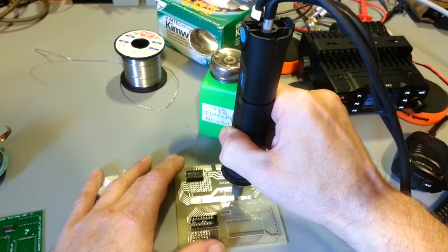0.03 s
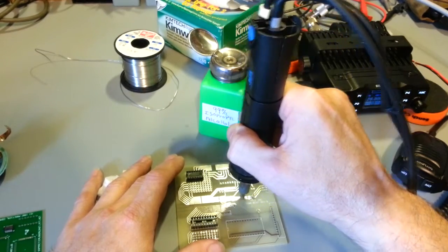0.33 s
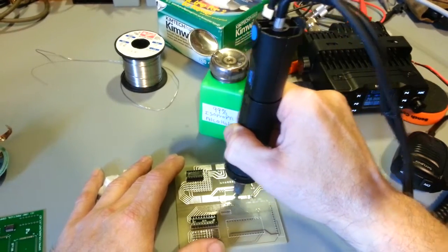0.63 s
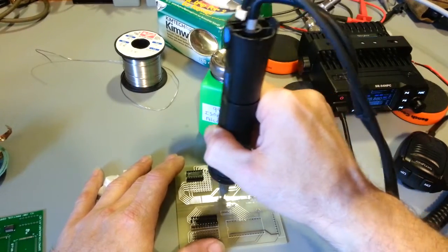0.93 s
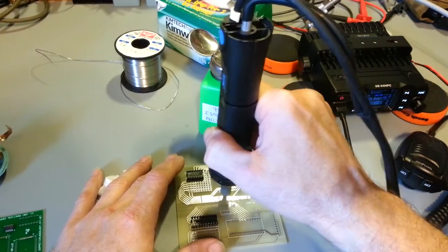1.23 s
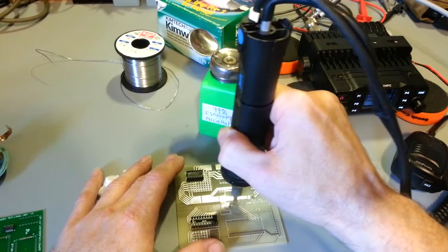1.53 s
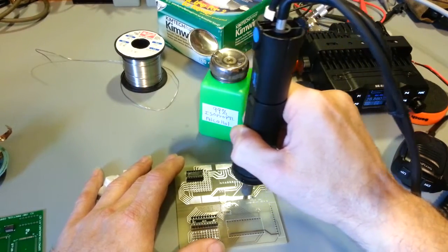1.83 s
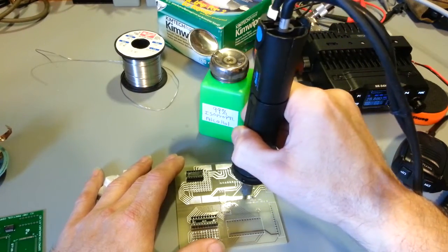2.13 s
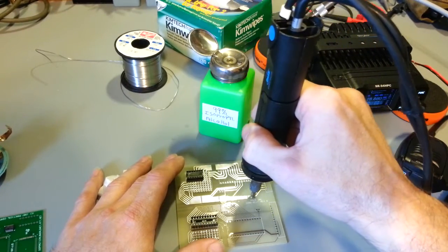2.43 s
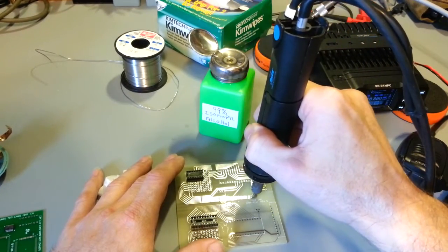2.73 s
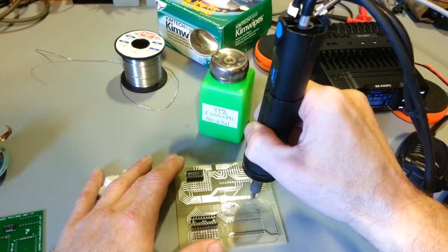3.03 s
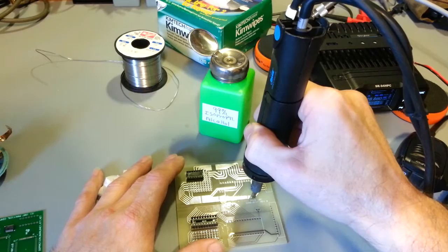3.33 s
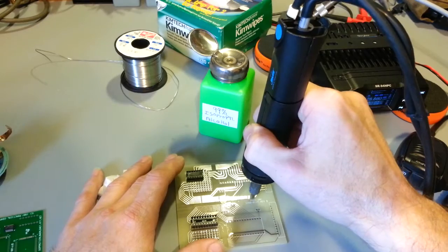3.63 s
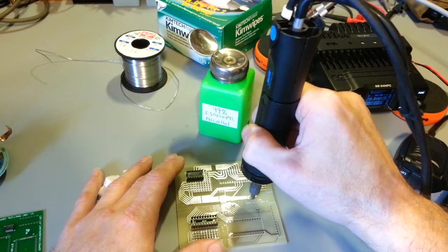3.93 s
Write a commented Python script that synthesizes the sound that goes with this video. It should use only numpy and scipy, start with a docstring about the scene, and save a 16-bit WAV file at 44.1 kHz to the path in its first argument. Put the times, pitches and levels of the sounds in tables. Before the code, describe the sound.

A desoldering gun's vacuum pump buzzes and hisses, then stops, leaving light metallic ticks.

```python
"""The buzzing drone of a desoldering gun's vacuum pump on a workbench, at 53 turns a second,
sagging a little while the nozzle is blocked. Air hisses and solder spits through the nozzle.
Near two seconds the trigger is let go and the pump stalls with a few knocks of its casing.
In the quiet room a fan hums, hand and hose rustle, and the metal nozzle ticks on the circuit board."""
import sys
import numpy as np
from scipy import signal
from scipy.fft import rfft, irfft
from scipy.io import wavfile

SR = 44100
rng = np.random.default_rng(int(sys.argv[2]) if len(sys.argv) > 2 else 0)


def persist_wave(psi):
    """Save psi, clipped to +-1, as 16-bit WAV."""
    counts = np.round(np.clip(psi, -1, 1) * 32767).astype(np.int16)
    wavfile.write(sys.argv[1], SR, np.atleast_2d(counts).T)


N = 176400
TIME = np.arange(N) / SR

# Ticks of trigger and nozzle: start_s, strength_db, then trims body_db, metal_db, treble_db, board_db
TICK_HITS = [(1.9593,-6,5.5,-3.5,-15,-18),(2.643,-25.5,5.5,-6,-2.5,-3),(3.0278,-11,-6,0.5,0,-6),(3.148,-12,1,3,6,3),(3.237,-35.5,-3,-3,0,-12),(3.31,-29,-12,-23,6,-13),(3.3664,-25,2.5,-2.5,-6,4),(3.6457,-14.5,-3,0.5,-6.5,-5.5)]


def pump():
    """Two strokes a turn make a drone with pulsing air and valve clatter; it dives away on stalling."""
    # Shaft harmonics: order, free_db, loaded_db, left_minus_right_db, left_lead_rad
    harmonics = [(1, -59, -59, 0, -0.1), (2, -57, -55, 1, 0.0), (3, -56, -55, 0, 0.5),
                 (4, -53, -51, 4, 0.0), (5, -49, -47, 0, 0.1), (6, -46, -42, 0, 0.1),
                 (7, -31, -33, -1, 0.0), (8, -56, -61, -4, 0.1), (9, -34, -34, -4, 0.2),
                 (10, -47, -40, -8, 0.7), (11, -38, -39, 6, -2.9), (12, -52, -42, 1, 1.6),
                 (13, -50, -47, -3, -0.5), (14, -46, -46, -4, 1.6), (15, -39, -33, 6, 0.5),
                 (16, -33, -47, 2, 0.1), (17, -36, -41, 9, -0.0), (18, -42, -40, -1, 0.5),
                 (19, -46, -45, 5, 1.8), (20, -42, -45, 6, 0.4), (21, -48, -44, 5, 1.2),
                 (22, -53, -49, 10, 0.6), (23, -54, -44, -2, 1.8), (24, -46, -49, 5, 1.5),
                 (25, -61, -57, -3, 0.0), (26, -55, -48, -4, 1.7), (27, -42, -54, -19, -0.9),
                 (28, -46, -50, -4, 2.6), (29, -46, -45, -4, -2.5), (30, -46, -47, 9, -3.1),
                 (31, -46, -48, 0, 0.7), (32, -48, -42, -4, 1.6), (33, -48, -54, -9, -1.3),
                 (34, -43, -44, -3, -0.4), (35, -48, -50, 5, -0.6), (36, -51, -54, 3, -2.2),
                 (37, -52, -44, 0, 2.8), (38, -51, -49, 4, -0.9), (39, -50, -46, 2, -1.0),
                 (40, -46, -48, 7, -1.7), (41, -47, -46, 2, 2.4), (42, -50, -55, -3, -2.0),
                 (43, -56, -57, -2, 0.7), (44, -60, -57, -1, -1.3)]
    # Shaft speed: time_s, turns_per_s
    speed = [(0,53.42),(.15,53.43),(.3,53.3),(.45,53.47),(.6,52.85),(.75,53.1),(1.08,53.1),(1.25,53.28),(1.36,53.5),(1.48,53.3),(1.72,53.31),(1.9,53.6)]
    # Suction load: time_s, share (0-1)
    suction_load = [(0,0.1),(.46,0.03),(.53,.85),(.72,1),(.93,1),(1.12,0.14),(1.4,0),(1.47,0.25),(1.66,0.13),(1.9,0.1)]
    # Faint buzz above the drone: pitch_hz, level_db
    buzz_levels = [(2400,-63),(2800,-62.5),(3200,-68),(3600,-67),(4000,-60),(4400,-69)]
    # Air rushing inside the pump: freq_hz, gain_db
    rush_eq = [(20,-18),(60,-24),(200,-27),(400,-8),(650,-7),(900,0),(1300,-1.5),(2100,-8),(2600,-11),(3400,-18),(4000,-11.5),(4500,-16),(5200,-16),(6000,-53),(15000,-45)]
    # Valve clatter: freq_hz, gain_db
    clatter_eq = [(500,-30),(1300,-10),(1800,15.5),(2250,-3),(2700,-7),(4000,9),(5500,-37),(14000,-35)]
    stop_s, stall_s, fade_db_per_s = 1.966, .1, 194
    smear_rad, chatter_order, clatter_decay_turns = .08, 24, 0.35
    coast_s = np.maximum(TIME - stop_s, 0)
    brake = np.maximum(1 - coast_s / stall_s, 0)
    turns = np.cumsum(curve(speed) * brake * (1 + 0.00099 * drift(hz=40))) / SR
    fade = amp(-fade_db_per_s * coast_s) * np.sqrt(brake)
    load = np.clip(curve(suction_load), 0, 1)
    orders, free_db, loaded_db = np.transpose(harmonics)[:3]
    drone, side = np.zeros((2, N)), np.array([[.5], [-.5]])
    for k, _, _, side_db, lead in harmonics:
        # The body's colour stays put while the harmonics slide down through it.
        free = np.interp(k * brake, orders, amp(free_db))
        loaded = np.interp(k * brake, orders, amp(loaded_db))
        gain = (1 - load) * free + load * loaded
        phase = np.pi / 2 * (k % 2) + .25 * rng.standard_normal()  # two strokes: odd orders in quadrature
        if k >= chatter_order:  # valve chatter loosens the phases
            phase = .8 * rng.standard_normal()
        phase -= smear_rad * k ** 2  # hose and casing delay the higher orders more
        flutter = 1 + .07 * drift(hz=25.6)
        pan = unit(amp(side * side_db))
        drone += np.sqrt(2) * gain * flutter * pan * np.cos(2 * np.pi * k * turns + phase + side * lead)
    for k in range(len(orders) + 1, 84):  # the buzz, leaning left
        gain = amp(read(buzz_levels, k * speed[0][1]) + 2.6 * rng.standard_normal((2, 1)) + side * 11.5)
        drone += gain * np.cos(2 * np.pi * (k * turns + rng.random((2, 1))))
    rush = amp(-39.5) * noise(rush_eq) * (1 + 0.39 * np.cos(2 * np.pi * 2 * turns))
    clatter = amp(-43) * noise(clatter_eq) * np.exp(-((turns + 0.23) % 1) / clatter_decay_turns)
    return room((drone + rush + clatter) * fade, wet_db=-20.5)


def stall_knocks():
    """The last slow strokes knock the pump casing."""
    # Last strokes: start_s, strength_db
    strokes = [(1.977,-30),(1.995,-27.5),(2.018,-41.5)]
    # Casing modes: pitch_hz, gain_db, t60_s
    casing = [(352,-21,0.13),(533,2,0.067),(662,-4.5,0.041),(835,-8,0.076),(1097,-7,0.08),(1620,-8,0.036),(1940,-8,0.051),(2230,-11,.04),(2800,-17,0.023)]
    knocks = np.zeros(N)
    for start_s, db in strokes:
        add(knocks, start_s, amp(db) * ring(casing))
    return room(knocks, wet_db=-7)


def nozzle_hiss():
    """Air sucked through the nozzle hisses in flickering surges."""
    # Surges: time_s, level_db
    surges = [(0,-41.5),(.2,-42.5),(.27,-37.5),(.34,-44.5),(.43,-42),(.46,-31.5),(.52,-31),(.57,-37.5),(.66,-43),(.86,-39.5),(1.05,-44),(1.35,-43),(1.42,-36.5),(1.48,-41.5),(1.57,-40),(1.68,-41.5),(1.9,-39.5),(1.96,-35),(2.02,-38.5),(2.085,-54.5),(2.16,-59),(2.21,-87)]
    # Bright hiss: freq_hz, gain_db
    hiss_eq = [(1500,-30),(3000,0),(4000,-6),(4500,1.5),(5200,-0.5),(6100,-5),(7300,3),(8600,4),(10200,3),(11400,-4.5),(12600,5),(13700,5),(14600,-2.5)]
    return unit(at_nozzle(noise(hiss_eq))) * amp(curve(surges) + 1.2 * drift(hz=85))


def solder_spits():
    """Solder spits in the nozzle in short, crackling bursts."""
    # Spits: start_s, strength_db, length_s
    spits = [(.007,-33,0.0039),(0.0089,-21.5,0.0028),(0.039,-21.5,0.0018),(.091,-31,.002),(0.1145,-19.5,0.0028),(.122,-34,0.0037),(.139,-25.5,0.0036),(.2105,-21,0.0017),(0.248,-18.5,0.024),(0.261,-21,0.035),(0.289,-23,0.0019),(0.305,-29,0.0035),(0.45,-28,.03),(0.492,-19,0.001),(.497,-25,0.044),(0.587,-23,0.052),(1.23,-31,0.0044),(1.395,-23.5,.02),(1.4267,-19.5,0.0019),(1.432,-21.5,0.0054)]
    # Sharp crackle: freq_hz, gain_db
    spit_eq = [(500,-18),(2000,4),(3200,-2),(4000,-1),(4700,6.5),(5400,-2),(6200,-4),(8000,2),(10500,-3),(12000,-10),(15000,-14)]
    crackle, t = np.zeros(N), TIME[:SR // 16]
    for start_s, db, length_s in spits:
        burst = rng.standard_normal(len(t)) * rng.exponential(1, len(t)) * np.exp(-2 * t / length_s)
        add(crackle, start_s, amp(db + 13.5) * burst / np.linalg.norm(burst))
    return at_nozzle(room(colour(crackle, spit_eq), wet_db=-4))


def ticks():
    """Each tick rings the gun's body, tube and tip over a dull board knock; the bench throws it back."""
    # Gun modes: pitch_hz, gain_db, t60_s
    gun = [(1074,-12.5,0.017),(1690,-5,0.0093),(2145,-3,0.0085),(3320,-5,0.0073),(3580,-1,0.0058),(4145,2.5,0.0088),(5050,-0.5,0.0043),(7400,-0.5,.004),(8300,-6,0.0048),(9570,-5,0.0049),(12700,-16,0.0012)]
    # Circuit board modes: pitch_hz, gain_db, t60_s
    board = [(332,-20.5,0.083),(485,-22.5,0.061),(650,-18.5,0.034),(980,-17,0.02)]
    # Early echoes off the bench and its gear: delay_s, left_gain, right_gain
    echoes = [(.0009,0.17,0.13),(.0022,0.49,.15),(.0062,0.45,0.075),(.009,.17,.08),(0.012,0.045,0.047)]
    body_top_hz, treble_from_hz = 2800, 6000
    hits = np.zeros(N)
    for start_s, db, body_db, metal_db, treble_db, board_db in TICK_HITS:
        modes = []
        for hz, gain_db, t60 in gun:
            trim_db = body_db if hz < body_top_hz else treble_db if hz > treble_from_hz else metal_db
            modes.append((hz, gain_db + trim_db, t60))
        add(hits, start_s, amp(db - 13) * (ring(modes) + amp(board_db) * ring(board)))
    ears = np.array([amp(-6) * np.roll(hits, 4), hits])  # softer and later on the left
    for delay_s, left, right in echoes:
        add(ears[0], delay_s, left * hits)
        add(ears[1], delay_s, right * hits)
    return room(ears, wet_db=-7.5)


def contact_snaps():
    """The first contact of metal puts a dry, bright snap on each tick."""
    # Snap: freq_hz, gain_db
    snap_eq = [(500,-28),(3000,-12),(6000,-3),(8500,7.5),(11000,-5),(14500,-7)]
    decay_s = .0006
    snaps, t = np.zeros(N), TIME[:SR // 100]
    for start_s, db, _, _, treble_db, _ in TICK_HITS:
        burst = rng.standard_normal(len(t)) * np.exp(-t / decay_s)
        add(snaps, start_s, amp(db + treble_db - 4) * burst / np.linalg.norm(burst))
    snaps = colour(snaps, snap_eq)
    return at_nozzle([np.roll(snaps, 4), snaps])


def handling():
    """Hand and hose slide in faint, grainy swishes; hands rumble on the bench."""
    # Swishes: centre_s, length_s, level_db
    slides = [(2.285,0.08,-56),(2.41,0.15,-61),(2.55,0.051,-58.5),(2.7,0.18,-61.5),(3.144,0.024,-51),(3.535,.05,-62),(3.804,0.1,-58.5)]
    # Sliding friction: freq_hz, gain_db
    slide_eq = [(100,0),(400,14),(1000,0),(4500,4.5),(6000,-3),(8000,8.5),(11500,-3),(14500,-16)]
    # Rumble swells: time_s, level_db
    swells = [(0,-78),(2.1,-64),(2.33,-68),(2.6,-65),(3.1,-71),(3.25,-61),(3.5,-68),(3.8,-62),(4,-64)]
    # Bench rumble: freq_hz, gain_db
    rumble_eq = [(20,-30),(70,-15),(115,-2),(170,-5),(280,-24),(600,-24),(3000,-60)]
    swishes = sum(amp(db) * np.exp(-(2 * (TIME - s) / length_s) ** 2) for s, length_s, db in slides)
    sliding = swishes * noise(slide_eq) * amp(2.4 * drift(hz=120))
    return sliding + amp(curve(swells)) * noise(rumble_eq)


def fan_hum():
    """A fan hums on three wavering low tones."""
    # Fan tones: pitch_hz, level_db
    tones = [(120,-74.5),(241,-67.5),(360.7,-69)]
    hum = np.zeros(N)
    for hz, db in tones:
        waver = 1 + 0.34 * drift(hz=3.9)
        hum += np.sqrt(2) * amp(db) * waver * np.sin(2 * np.pi * hz * TIME + 0.19 * drift(hz=1.4))
    return hum


def room_tone():
    """A soft, slightly restless bed of noise."""
    # Bass-heavy bed: freq_hz, gain_db
    bed_eq = [(12, -68), (20, -36), (65, -15), (91, -16), (123, -8.5), (176, -10), (239, -11.5), (267, -11),
              (361, -15.5), (392, -16.5), (489, -19), (825, -21.5), (1180, -24), (2700, -24.5),
              (3660, -27.5), (4430, -28), (14500, -25.5)]
    return amp(-56.5) * noise(bed_eq) * amp(1.6 * drift(hz=9.8))


def room(x, wet_db):
    """Adds the room's short diffuse tail, different in each ear."""
    # Room decay: freq_hz, t60_s
    decay = [(100,0.75),(300,0.21),(700,0.24),(1700,0.2),(4500,0.13),(9000,0.13),(14000,0.038)]
    size = SR // 2
    taps = rng.standard_normal((2, size)) * np.clip(TIME[:size] / 0.0035 - .5, 0, 1)
    hz, t, bands = signal.stft(taps, SR, nperseg=256)
    tail = signal.istft(bands * amp(-60 * t / read(decay, hz)[:, None]), SR, nperseg=256)[1]
    wet = signal.fftconvolve(np.atleast_2d(x), tail / np.linalg.norm(tail[0]), axes=1)[:, :N]
    return x + amp(wet_db) * wet


def at_nozzle(x):
    """Places a sound at the nozzle: its top end leans right."""
    # Balance: freq_hz, left_minus_right_db
    balance = [(2500,5),(4000,2),(4700,0),(5900,2.5),(7400,-8.5),(9200,-2.5),(11200,-10),(12500,-1.5),(14500,-4.5)]
    return np.array([colour(ear, [(hz, side * db / 2) for hz, db in balance])
                     for ear, side in zip(x, (1, -1))])


def noise(eq):
    """Wide coloured noise at rms 1, slightly alike in both ears in the lows and mids."""
    # Likeness of the ears: freq_hz, correlation
    likeness = [(50,0.24),(300,0.14),(700,0.33),(1500,0.13),(4000,0),(14000,0)]
    left, other = rfft(rng.standard_normal((2, N)))
    shared = np.clip(read(likeness, np.fft.rfftfreq(N, 1 / SR)), -1, 1)
    right = shared * left + np.sqrt(1 - shared ** 2) * other
    return unit(colour(irfft(np.array([left, right]), N), eq))


def ring(modes):
    """Dying sines of a struck object."""
    t = TIME[:SR // 4]
    return sum((-1) ** k * amp(db - 60 * t / t60) * np.sin(2 * np.pi * hz * t)
               for k, (hz, db, t60) in enumerate(modes))


def drift(hz):
    """Random wander at rms 1, up to about the given rate."""
    rolloff = 1 + (np.fft.rfftfreq(N, 1 / SR) / hz) ** 4
    return unit(irfft(rfft(rng.standard_normal(N)) / rolloff, N))


def colour(x, eq):
    """Filters by a table of freq_hz, gain_db."""
    return irfft(rfft(x) * amp(read(eq, np.fft.rfftfreq(N, 1 / SR))), N)


def read(points, hz):
    """Reads a table on a log-frequency axis."""
    freqs, values = np.transpose(points)
    return np.interp(np.log(hz + 1), np.log(freqs + 1), values)


def curve(points):
    """A control curve, sample by sample."""
    return np.interp(TIME, *np.transpose(points))


def add(mix, start_s, sound):
    """Mixes a sound in at a time."""
    part = mix[max(round(start_s * SR), 0):][:len(sound)]
    part += sound[:len(part)]


def amp(db):
    """Decibels to gain."""
    return 10 ** (np.asarray(db) / 20)


def unit(x):
    """Scales to rms 1."""
    return x / np.sqrt(np.mean(x ** 2) + 1e-20)


def scene():
    """The gun on the bench, over the quiet room."""
    gun = pump() + stall_knocks() + nozzle_hiss() + solder_spits() + ticks() + contact_snaps()
    return gun + fan_hum() + room_tone() + handling()


def record(dry):
    """A steep high cut takes off the very top."""
    high_cut = signal.firwin(511, cutoff=14730, window=("kaiser", 9), fs=SR)
    return signal.oaconvolve(dry, high_cut[None], "same")


dry = scene()
out = record(dry)
persist_wave(out)
```